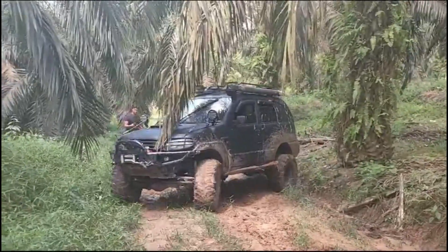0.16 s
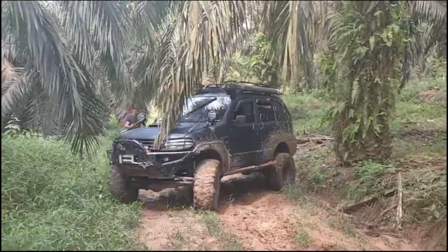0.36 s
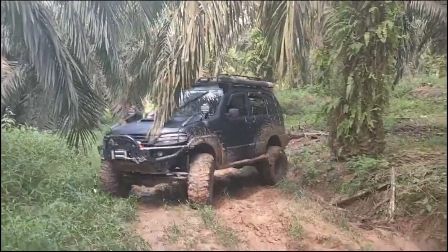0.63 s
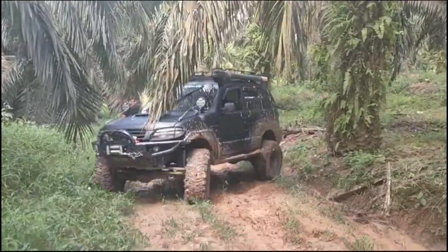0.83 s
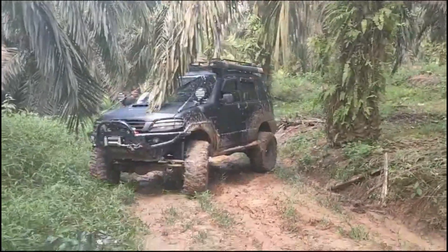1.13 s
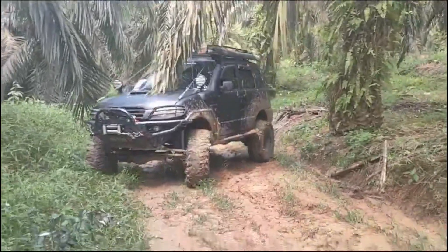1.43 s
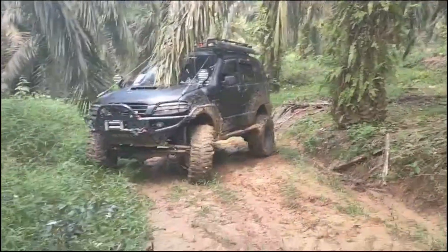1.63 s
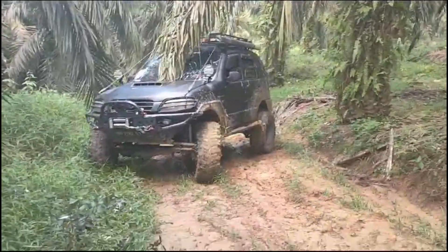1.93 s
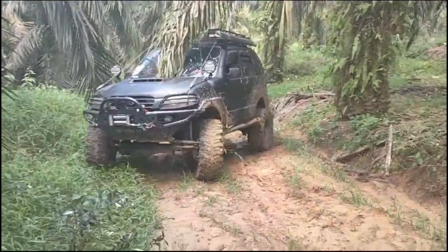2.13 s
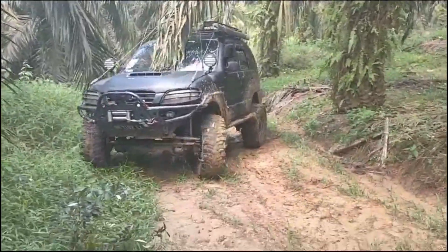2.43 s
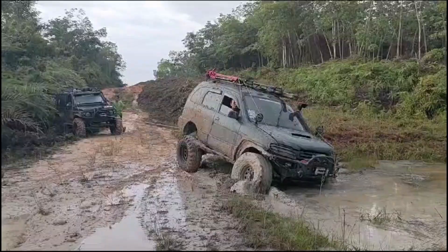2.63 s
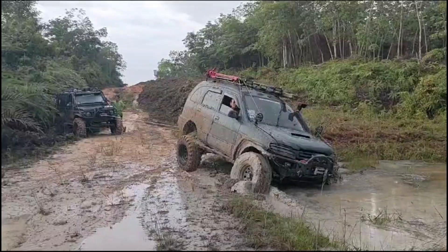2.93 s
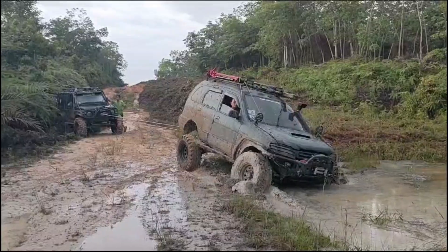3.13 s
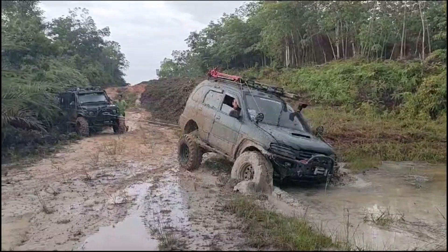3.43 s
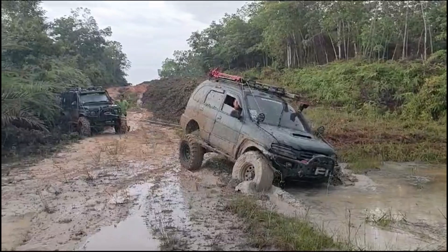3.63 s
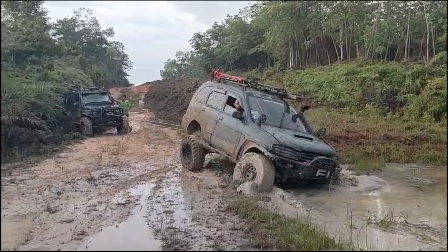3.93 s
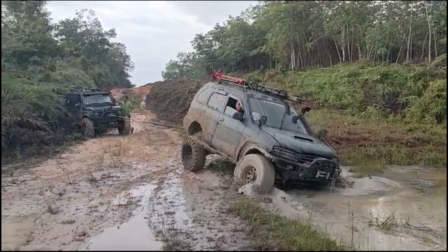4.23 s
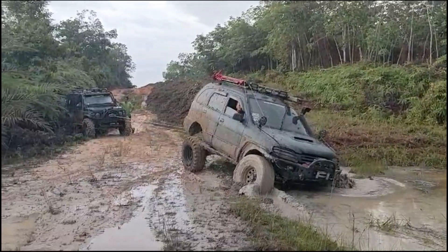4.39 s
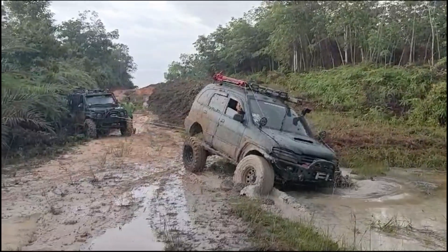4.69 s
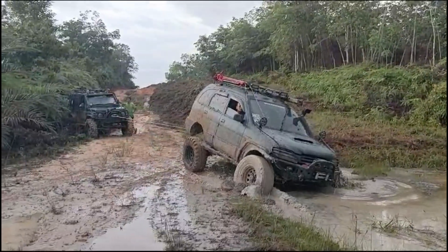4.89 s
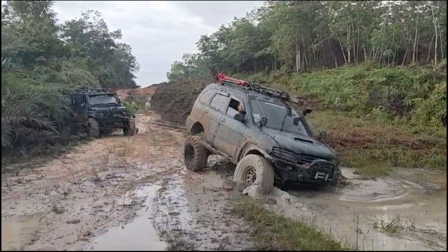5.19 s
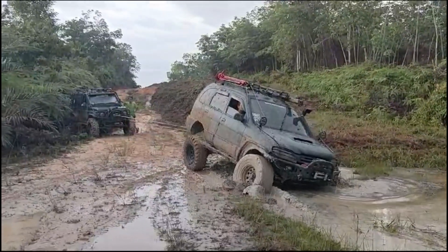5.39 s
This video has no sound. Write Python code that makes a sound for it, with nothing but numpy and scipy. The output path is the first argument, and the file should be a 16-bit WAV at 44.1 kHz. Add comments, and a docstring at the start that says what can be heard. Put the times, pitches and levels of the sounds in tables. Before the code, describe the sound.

A four-cylinder diesel throbs deeply on a dirt track, surging, sagging to a slow lug with loose metal rattling, then climbing to a loping roar. It cuts hard; after a tiny gap a faster, closer truck fades in, dips and revs again under a whining fan, with a soft bump, fine water spray and faint cicadas. Outdoor stereo, small handheld microphone with low wind rumble.

```python
"""First a deep diesel beat: a four-cylinder truck lugs off road through a palm grove. It rattles at its lowest revs.
After a hard cut and a short gap, a second such truck fades in, churning in a mud pool under a fan's whine.
Each exhaust is a stack of tones locked to the firings; growl, clatter, wind, spray and rattles are shaped noise.
The fan, a hum and a whistle are wavering tones; a damped bump is the chassis landing.
Cicadas in the trees behind are narrow bands of pulsing noise."""
import sys
import numpy as np
from scipy import signal
from scipy.fft import rfft, irfft, next_fast_len
from scipy.io import wavfile
from scipy.ndimage import uniform_filter1d, map_coordinates

SR = 44100
rng = np.random.default_rng(int(sys.argv[2]) if len(sys.argv) > 2 else 0)


def unload_wav(signal):
    """Save mono or channel-first audio to the path in sys.argv[1] as 16-bit WAV at rate SR, clipped to [-1, 1]."""
    wavfile.write(
        sys.argv[1],
        SR,
        np.round(np.clip(np.atleast_2d(signal).T, -1, 1) * 32767).astype(np.int16),
    )


N = 244781
TIME = np.arange(N) / SR  # s
SIZE = next_fast_len(N + SR // 2)
HZ = np.fft.rfftfreq(SIZE, 1 / SR)

# How the first engine runs and pulls: start_s, firings_hz, load_db, boom_db (low exhaust over the rest)
GROVE_ENGINE = [(0, 33.15, -56.5, 6), (.07, 32.7, -42.5, -8), (.15, 30.9, -45.5, 6.5),
                (.25, 34.57, -45, 11), (.32, 34.92, -42, 9), (.55, 42.72, -34, -0.5),
                (.62, 44.37, -40, 9.5), (.7, 45.26, -39, 7.5), (.87, 39.74, -36.5, -2),
                (1.09, 32.18, -54.5, 20), (1.31, 29.24, -45.5, 3), (1.4, 28.6, -43, -2),
                (1.5, 34.1, -42, 4.5), (1.57, 39.26, -36.5, 6), (1.68, 44.8, -36.5, -6),
                (1.75, 47.13, -46.5, 9.5), (1.9, 50.2, -35.5, -3.5), (2.09, 56.8, -14.5, -33.5),
                (2.18, 55.04, -20.5, -26), (2.35, 50.5, -34.5, -10), (2.47, 51.65, -35.5, -0.5),
                (2.55, 53, -33.5, -2)]
# How its exhaust pipe colours a tone: pitch_hz, gain_db
GROVE_PIPE_COLOUR = [(30, -42), (55, 11), (75, 16), (95, 4.5), (120, 7), (175, 11.5), (198, 18),
                     (212, 11.5), (225, 3), (245, 1), (290, 0.5), (335, -5.5), (365, -13), (410, -15.5),
                     (450, -22), (520, -43)]
# Extra level of its upper exhaust tones: start_s, gain_db
GROVE_UPPER_TONES = [(0, 5), (.25, -12.5), (.55, -4), (.85, -3), (1.0, 1), (1.2, 1), (1.45, -0.5),
                     (1.6, -5), (1.75, 2), (1.9, 6.5), (2.1, -11), (2.25, -0.5), (2.38, 7.5), (2.55, 10)]
# Relative strength of its four cylinders: gain_db, before the lope scales it
GROVE_CYLINDER_STRENGTH = [-2, -8, 1.5, 3]
# How unevenly the cylinders fire: start_s, amount (0 to 1)
GROVE_LOPE = [(0, .1), (1.93, .08), (2.05, 1), (2.25, 1), (2.38, .12)]
# Colour of its low exhaust noise: pitch_hz, relative level_db
GROVE_RUMBLE_COLOUR = [(18, -60), (30, -18), (108, -6.5), (189, -4.5), (217, 4.5), (467, -22), (600, -48),
                       (780, -76), (1320, -120)]
# Colour of its growl and clatter: pitch_hz, relative level_db (per Hz)
GROVE_NOISE_COLOUR = [(290, -39), (500, -6), (648, 2.5), (706, 2), (876, -0.5), (1350, -1.5), (1750, -10.5),
                      (1880, -4), (3480, -15), (4070, -12.5), (7030, -22.5), (8120, -36), (11100, -36),
                      (15500, -47.5)]
# Which side its noise leans to: pitch_hz, left_minus_right_db
GROVE_LEAN = [(60, -1.5), (1290, 0.5), (2250, 3.5), (4100, -12.5), (5700, 6), (6800, -5.5), (7400, -6),
              (8120, 3), (15000, -1.5)]
# Wind on the ports that pick up the sound: start_s, level_db
WIND_LEVEL = [(0.0, -67), (0.29, -37), (0.82, -54), (1.01, -35), (1.6, -36), (1.82, -55.5), (2.55, -61)]


def grove_truck(ports):
    """Deep exhaust beat that lopes at high revs, with engine noise that grows with the revs and wind on the ports."""
    hz, load_db, boom_db = curves(GROVE_ENGINE)
    orders_db = orders(hz, load_db, boom_db, GROVE_PIPE_COLOUR, odd=(51.4, -2),
                       upper=(GROVE_UPPER_TONES, 232), count=11, waver_db=.2)
    octaves = np.log2(hz / 40)  # revs above 40 firings a second
    growl_db = -44.5 + 9 * octaves
    clatter_db = -39 + 2.5 * octaves

    turns = firings(hz, jitter=0.012)
    lope, = curves(GROVE_LOPE)
    beat = strength(turns, GROVE_CYLINDER_STRENGTH, lope, scatter_db=1.0)
    # at high revs the tones fall out of step: 0.05 radians per firing Hz above 46
    spread = .05 * np.clip(hz - 46, 0, None)
    boom = -beat * exhaust(turns, orders_db, lag=.035, drift=.22, spread=spread)

    load = total(orders_db)
    rumble = amp(-14.5) * load * rush(coloured(GROVE_RUMBLE_COLOUR), ports, GROVE_LEAN,
                                      puffs(turns, 0.073, 0.76), patchy_db=.5)
    noise = engine_noise(GROVE_NOISE_COLOUR, ports, GROVE_LEAN,
                         puffs(turns, 0.13, 2.6, scatter_db=3), growl_db, clatter_db)
    wind_band = lambda f: 1 / (1 + (f / 32) ** 4) / (1 + (14 / (f + 1)) ** 4)
    wind = amp(curves(WIND_LEVEL)[0]) * rush(wind_band, ports, GROVE_LEAN)
    return both(boom, late_s=.000045) + rumble + noise + wind


# How the second engine runs and pulls: start_s, firings_hz, load_db, boom_db (low exhaust over the rest)
POOL_ENGINE = [(2.62, 85.5, -23.5, -13.5), (2.9, 82.14, -24, -9.5), (2.99, 80.4, -29, -1),
               (3.03, 83.2, -21.5, -9.5), (3.12, 85.9, -30, 4), (3.37, 89.94, -37.5, 8.5),
               (3.44, 84.6, -41, 8), (3.52, 81.5, -43, 3), (3.6, 75.13, -51, 17), (3.72, 65.35, -33, -10),
               (3.8, 62.94, -34.5, -8), (3.95, 66.46, -22.5, -9.5), (4.04, 71.15, -24, -9.5),
               (4.1, 75.6, -30, 11.5), (4.17, 81.55, -22.5, -6), (4.24, 84.74, -31.5, 9),
               (4.37, 80.86, -33.5, 2.5), (4.51, 81.06, -33, 3), (4.59, 78.35, -29, 4.5),
               (4.75, 81.37, -29.5, 3), (4.98, 80.7, -34.5, 4), (5.05, 78.64, -34.5, 0.5),
               (5.14, 73.2, -36, 9), (5.24, 71.43, -34, 1), (5.33, 66.62, -37, 1),
               (5.45, 59.03, -38.5, -19), (5.55, 56.86, -31, -7)]
# How its exhaust pipe colours a tone: pitch_hz, gain_db
POOL_PIPE_COLOUR = [(55, 7), (80, 5.5), (125, -3), (145, 6), (170, 8), (190, 13), (215, -2), (250, 4),
                    (290, -5), (330, -7.5), (450, -9.5)]
# Extra level of its upper exhaust tones: start_s, gain_db
POOL_UPPER_TONES = [(2.62, -7), (2.8, -0.5), (2.95, -2), (3.2, 6.5), (3.4, 16.5), (3.6, 19), (3.85, -19),
                    (4.0, -3.5), (4.15, 2), (4.3, 7.5), (4.6, -1.5), (4.9, 7), (5.2, 6.5), (5.55, 4)]
# Relative strength of its four cylinders: gain_db, before a fixed scaling
POOL_CYLINDER_STRENGTH = [0.1, 0.53, -0.78, -0.11]
# Level of its intake growl: start_s, level_db
POOL_GROWL_LEVEL = [(2.75, -30), (2.85, -28.5), (3.8, -34), (4.07, -28.5), (4.3, -34), (5.15, -33),
                    (5.22, -33), (5.5, -32)]
# Colour of its low exhaust noise: pitch_hz, relative level_db
POOL_RUMBLE_COLOUR = [(15, -42), (25, -24), (108, -10), (174, 4), (325, 1.5), (560, -21), (700, -12.5),
                      (910, -8), (1540, -120)]
# Colour of its growl and clatter: pitch_hz, relative level_db (per Hz)
POOL_NOISE_COLOUR = [(260, -24.5), (450, -12), (596, -17.5), (1060, -8.5), (1310, -14), (1680, -6.5),
                     (3320, -13.5), (3740, -11.5), (4150, -18), (5000, -16.5), (5330, -27.5), (5640, -14.5),
                     (6120, -35.5), (6270, -24), (6450, -33), (6800, -29.5), (9650, -44), (10700, -36),
                     (11200, -43), (14400, -43.5), (15500, -45)]
# Which side the noise at the pool leans to: pitch_hz, left_minus_right_db
POOL_LEAN = [(60, 0.5), (500, 0), (700, 4.5), (1000, -3.5), (1220, -9), (1500, 7.5), (2000, -12),
             (2400, 4.5), (2850, -16), (3300, 12), (3700, -12.5), (4300, 7), (5000, -6), (5600, -.5),
             (7200, -2), (8500, 0.5), (15000, -3.5)]


def pool_truck(ports):
    """Faster exhaust and close engine noise, both pulsing with the firings, plus fan, whistle and hum."""
    hz, load_db, boom_db = curves(POOL_ENGINE)
    orders_db = orders(hz, load_db, boom_db, POOL_PIPE_COLOUR, odd=(46.6, -0.15),
                       upper=(POOL_UPPER_TONES, 260), count=5, waver_db=.3)
    growl_db, = curves(POOL_GROWL_LEVEL)
    # the clatter follows a share of the growl's swings
    clatter_db = -29.5 + .24 * (growl_db - growl_db[TIME > START_S].mean())

    turns = firings(hz, jitter=0.004)
    beat = strength(turns, POOL_CYLINDER_STRENGTH, .9, scatter_db=.6)
    boom = beat * exhaust(turns, orders_db, lag=.1, drift=.25)

    # the sharp edge of each firing carries faint high orders through the intake
    edge = np.zeros(N)
    for k in range(9, 15):
        edge_db = growl_db - 1 + along(POOL_NOISE_COLOUR, k * hz) + 3.5 * wobble(14)
        edge += amp(edge_db) * np.cos(2 * np.pi * k * turns + 1.27 * wobble(30))

    load = total(orders_db)
    rumble = amp(-20.5) * load ** 0.33 * rush(coloured(POOL_RUMBLE_COLOUR), ports, POOL_LEAN,
                                              puffs(turns, 0.06, 0.5))
    noise = engine_noise(POOL_NOISE_COLOUR, ports, POOL_LEAN,
                         beat * puffs(turns, .24, 4, scatter_db=2.5), growl_db, clatter_db)
    return both(boom, late_s=.00007) + edge + rumble + noise + cooling_fan(hz) + whistle(hz) + hum()


def exhaust(turns, orders_db, lag, drift, spread=0):
    """Firing orders, nearly in step so that each firing is a pulse; the pipe delays the higher ones."""
    out = 0
    for k, db in enumerate(orders_db, 1):
        phase = 2 * np.pi * k * turns - lag * k * k - spread * (k - 4) ** 2 + drift * wobble(6)
        out = out + amp(db) * np.sqrt(2) * np.cos(phase)
    return out


def orders(hz, load_db, boom_db, pipe, odd, upper, count, waver_db):
    """Level of each firing order: load, pipe colour, boom on the low ones, extra on the upper; high ones waver more."""
    odd_from_hz, odd_db_per_hz = odd  # odd orders fade at high revs
    upper_rows, upper_from_hz = upper
    odd_db = odd_db_per_hz * np.clip(hz - odd_from_hz, 0, None)
    upper_db, = curves(upper_rows)
    levels = []
    for k in range(1, count + 1):
        pitch = k * hz
        db = load_db + along(pipe, pitch)
        db = db + boom_db / (1 + (pitch / 161.3) ** 6)  # low boom, below 161.3 Hz
        db = db + upper_db / (1 + (upper_from_hz / pitch) ** 12)
        db = db + k % 2 * odd_db + k * waver_db * wobble(13)
        if k == 1:
            db = db - 3.5  # the pipes pass the firing rate itself poorly
        levels.append(db)
    return levels


def total(levels_db):
    """Combined strength of several tones, adding their powers."""
    return np.sqrt(sum(amp(db) ** 2 for db in levels_db))


def firings(hz, jitter):
    """Running count of firings, the shaft running a little unevenly."""
    return np.cumsum(hz) / SR + jitter * wobble(30)


def strength(turns, cylinders_db, uneven, scatter_db):
    """Gain of the current firing: its cylinder's own strength plus chance, the average kept level."""
    count = int(turns.max()) + 4
    own, chance = np.resize(cylinders_db, count), rng.standard_normal(count)
    at = lambda values: map_coordinates(values, [np.abs(turns)], order=1)
    gain = amp(uneven * at(own) + scatter_db * at(chance))
    return gain / np.sqrt(np.abs(uniform_filter1d(gain ** 2, size=SR // 6)))


def puffs(turns, depth, sharp, scatter_db=0):
    """An envelope that jumps at each firing, by a chance amount, and fades before the next."""
    depth = np.clip(depth, 0, 1)
    chance = rng.standard_normal(int(turns.max()) + 2)[np.abs(turns).astype(int)]
    bursts = amp(scatter_db * chance) * np.exp(-sharp * (turns % 1))
    return 1 - depth + depth * unit(bursts)


def engine_noise(spectrum, ports, side, envelope, growl_db, clatter_db):
    """Intake growl below 1290 Hz and block clatter above, each on its own level."""
    low = lambda f: 1 / (1 + (f / 1290) ** 12)
    colour = coloured(spectrum)
    growl = rush(lambda f: colour(f) * np.sqrt(low(f)), ports, side, envelope, patchy_db=1.3)
    clatter = rush(lambda f: colour(f) * np.sqrt(1 - low(f)), ports, side, envelope, patchy_db=1.2)
    return amp(growl_db) * growl + amp(clatter_db) * clatter


# Loose panels struck: start_s, level_db (nominal, lowered for ring and crack), crack_db (crack against ring)
PANEL_STROKES = [(1.135, -32, -8), (1.169, -31, -2), (1.199, -27, 2), (1.232, -27.5, -3),
                 (1.265, -28.5, -1), (1.299, -30, -2), (1.332, -25, -2), (1.366, -28, -6),
                 (1.401, -24.5, 0), (1.434, -27.5, -4), (1.466, -25, 0), (1.496, -30, -5), (1.53, -34, -6)]
# Tinny buzz: start_s, level_db (at a stroke, before chance and fading)
TIN_BUZZ = [(1.0, -60), (1.042, -52), (1.14, -44.5), (1.2, -47.5), (1.37, -45.5), (1.4, -38.5),
            (1.47, -38.5), (1.53, -44.5), (1.6, -69.5)]
# What rings in the panels: pitch_hz, width_hz, relative level_db
PANEL_RINGS = [(853, 360, -1), (1365, 280, -1), (1883, 360, -2), (2550, 380, -7), (3820, 580, -12)]
# What sounds in the crack of a stroke: pitch_hz, width_hz, relative level_db
CRACK_RINGS = [(1900, 1300, 0)]
# What rings in the thin tin: pitch_hz, width_hz, relative level_db
TIN_RINGS = [(6980, 540, 0)]


def rattle(ports):
    """Knocked panels ring and crack at listed moments; thin tin, shaken once a firing, buzzes longer."""
    hz = curves(GROVE_ENGINE)[0]
    turns = np.cumsum(hz) / SR
    turns = turns - np.interp(1.8, TIME, turns)  # one tin stroke falls at 1.8 s, the others a firing apart
    t = turns % 1 / hz  # s since the last tin stroke
    stroke = np.floor(turns - turns.min()).astype(int)
    chance = rng.standard_normal(stroke.max() + 1)[stroke]
    tin = amp(curves(TIN_BUZZ)[0] + 1.4 * chance - 60 * t / 0.43) * (1 - np.exp(-t / 0.00079))

    panels, cracks = np.zeros(N), np.zeros(N)
    for start_s, db, crack_db in PANEL_STROKES:
        after = np.clip(TIME - start_s, 0, None)
        panels += amp(db - 5 - 60 * after / .15) * (1 - np.exp(-after / .0008))
        cracks += amp(db - 9 + crack_db - 60 * after / .03) * (after > 0)

    panel_noise = rush(modes(PANEL_RINGS), ports, GROVE_LEAN, amp(2 * wobble(300)), patchy_db=2.5)
    crack_noise = rush(modes(CRACK_RINGS), ports, GROVE_LEAN)
    tin_noise = rush(modes(TIN_RINGS), ports, GROVE_LEAN, amp(2.8 * wobble(180)))
    return panels * panel_noise + cracks * crack_noise + tin * tin_noise


def modes(table):
    """Gain of a set of resonances, each a peak of its own width."""
    return lambda f: np.sqrt(sum(amp(db) ** 2 / (1 + (2 * (f - hz) / width) ** 4)
                                 for hz, width, db in table))


FAN_ORDER = 12.28  # blade passes per firing
# How loud the fan whines: start_s, whine_db, overtone_db (both before they waver)
FAN_LEVELS = [(2.62, -44, -54), (2.9, -41, -50), (3.1, -38, -50), (3.42, -37, -50), (3.55, -48, -47),
              (3.68, -46, -40), (3.87, -38, -42), (4.0, -44, -39), (4.12, -37, -48), (4.25, -44, -44),
              (4.4, -44, -49), (4.5, -42, -44), (4.57, -45, -50), (4.66, -45, -42), (4.8, -45, -46),
              (5.0, -43, -45), (5.1, -36, -43), (5.2, -43, -52), (5.3, -45, -40), (5.42, -46, -52),
              (5.55, -46, -55)]
# Which side the fan's overtone leans to: pitch_hz, left_minus_right_db
OVERTONE_LEAN = [(1550, 7), (1750, 5), (1900, -6), (2050, -7)]


def cooling_fan(hz):
    """Blades chop the air at a pitch tied to the revs, with an overtone an octave up that moves between the sides."""
    fan_db, overtone_db = curves(FAN_LEVELS)
    blades = 2 * np.pi * FAN_ORDER * np.cumsum(hz) / SR
    fan = amp(fan_db) * whine(blades, 18)
    lean_db = along(OVERTONE_LEAN, 2 * FAN_ORDER * hz) / 2 * [[1], [-1]]
    overtone = amp(overtone_db + 1.5 * wobble(11) + lean_db) * whine(2 * blades, 22)
    return fan + overtone


# Faint whistle: start_s, left_level_db (before it wavers)
WHISTLE_LEVEL = [(2.9, -65), (3.05, -44), (3.3, -44), (3.45, -60), (3.6, -90)]


def whistle(hz):
    """A faint whistle, 16.6 cycles per firing, so it follows the revs; the right side is 15 dB weaker."""
    level_db = curves(WHISTLE_LEVEL)[0] + [[0], [-15]]
    return amp(level_db) * whine(2 * np.pi * 16.6 * np.cumsum(hz) / SR, 8)


def hum():
    """A wavering hum around a fixed 1650 Hz, stronger on the left, that swells briefly around 4.83 s."""
    level_db = -52 + 13 * np.exp(-((TIME - 4.83) / .11) ** 2)
    return amp(level_db + [[3], [-4]]) * whine(2 * np.pi * 1650 * TIME, 10)


def whine(phase, rate):
    """A tone whose size and phase wander, as in turbulent air, at the given rate (knots a second)."""
    steady = 1.1 * np.cos(phase)
    stirred = wobble(rate) * np.cos(phase) + wobble(rate) * np.sin(phase)
    return steady + .6 * stirred


# Water thrown by the wheels: start_s, level_db
SPLASH_LEVEL = [(2.62, -46.5), (4.3, -47.5), (4.93, -46), (5.45, -41.5), (5.55, -38.5)]
# Colour of that water: pitch_hz, relative level_db (per Hz)
SPRAY_COLOUR = [(3000, -50), (5000, 2), (7000, -6), (9000, -19), (15500, -24)]


def spray(ports):
    """Water thrown by the wheels: bright noise that flutters at random."""
    flutter = amp(3 * wobble(60))
    return amp(curves(SPLASH_LEVEL)[0]) * rush(coloured(SPRAY_COLOUR), ports, POOL_LEAN, flutter, patchy_db=2.2)


# The chassis lands: start_s, level_db, pitch_hz, fade_s (time to fall 60 dB)
CHASSIS_THUD = [(3.018, -25, 60, 0.091)]


def thud():
    """The landing chassis gives a low bump, a sine that dies away quickly."""
    out = np.zeros(N)
    for start_s, db, hz, fade_s in CHASSIS_THUD:
        t = np.clip(TIME - start_s, 0, None)
        out += amp(db - 60 * t / fade_s) * np.sin(2 * np.pi * hz * t)
    return out


# Kinds of cicada: pitch_hz, width_hz, relative level_db, pulses_per_s (on average)
CICADA_KINDS = [(10474, 79, 0.5, 61), (9000, 88, -7, 36)]
# Swelling of the whole chorus: start_s, gain_db
CHORUS_LEVEL = [(2.62, -61), (3.7, -56), (4.1, -64.5), (4.6, -57), (5.55, -54.5)]


def cicadas(ports):
    """Narrow noise bands, pulsing fast and swelling together."""
    out = np.zeros((2, N))
    for hz, width, db, rate in CICADA_KINDS:
        pulse_hz = rate * (1 + .06 * wobble(1.5))
        pulse = 1 + .6 * np.sin(2 * np.pi * np.cumsum(pulse_hz) / SR)
        band = lambda f: np.exp(-((f - hz) / width) ** 2)
        out += amp(db + 0.76 * wobble(6.5)) * rush(band, ports, POOL_LEAN, pulse, patchy_db=.8)
    return amp(curves(CHORUS_LEVEL)[0]) * out


def rush(gain, ports, side, envelope=1, patchy_db=3.0):
    """Stereo noise of rms 1 under an envelope, in patches of random gain, then coloured."""
    share, turn = ports
    z = signal.stft(rng.standard_normal((2, N)), nperseg=512)[2]
    field = uniform_filter1d(rng.standard_normal(z.shape[1:]), size=5, axis=0)
    field = uniform_filter1d(field, size=10, axis=1)
    patchy = signal.istft(z * amp(patchy_db * unit(field)), nperseg=512)[1][:, :N]
    shared, apart = rfft(envelope * patchy, SIZE) * gain(HZ) * np.sqrt([share, 1 - share])
    lean = amp(along(side, HZ) / 2)
    left = (shared + apart) * lean
    right = (shared - apart) * turn / lean
    return unit(irfft([left, right], SIZE)[:, :N])


def ports_of(alike, paths):
    """Share of sound common to both ports and the turn of phase at the right one."""
    in_step = 1 / (1 + (HZ / 1150) ** 12)  # below 1150 Hz both ports move in step
    arrivals = sum(gain * np.exp(-2j * np.pi * HZ * delay_s) for delay_s, gain in paths)
    late = in_step + (1 - in_step) * arrivals
    return (1 + np.clip(along(alike, HZ) * np.abs(late), 0, 1)) / 2, late / np.abs(late)


def both(x, late_s):
    """One sound at both ports, the right one late."""
    return np.array([x, np.interp(TIME - late_s, TIME, x)])


def amp(db):
    """Decibels to a plain gain."""
    return 10 ** (np.asarray(db) / 20)


def unit(x):
    """Scale to an rms of 1."""
    return x / np.sqrt(np.mean(x ** 2) + 1e-20)


def along(points, hz):
    """Read (pitch_hz, value) points on a log pitch axis."""
    f, v = np.transpose(points)
    return np.interp(np.log(hz + 1), np.log(f + 1), v)


def coloured(points):
    """Gain at every pitch from (pitch_hz, level_db) points."""
    return lambda f: amp(along(points, f))


def curves(rows):
    """One value per sample for each column after the time."""
    s, *cols = np.transpose(rows)
    return [np.interp(TIME, s, c) for c in cols]


def wobble(rate):
    """A smooth random curve, rate knots a second."""
    return map_coordinates(rng.standard_normal(int(N * rate / SR) + 4), [TIME * rate])


def filtered(x, response):
    """x times a response over frequency."""
    return irfft(rfft(x, SIZE) * response(HZ), SIZE)[..., :N]


CUT_S, START_S = 2.558, 2.6095  # the first place ends, the second begins
# How alike left and right are, before the paths act: pitch_hz, likeness (0 to 1)
GROVE_LIKENESS = [(30, .998), (200, .997), (330, .99), (500, .95), (770, .95), (1030, .65), (1250, .75),
                  (1650, .35), (1900, .5), (2300, .35), (2900, .4), (4200, .15), (5400, .38), (6400, .15),
                  (15000, .2)]
POOL_LIKENESS = [(30, .998), (210, .995), (330, .985), (510, .65), (770, .96), (1030, .8), (1250, .4),
                 (15000, .4)]
# Ways of the shared sound to the right port, one of them inverted: delay_s (negative is early), gain
GROVE_ARRIVALS = [(.00036, 1), (-.0002, -.5)]
POOL_ARRIVALS = [(.000306, .75), (.001406, -.75)]


def scene():
    """The first place stops at the cut, leaving a very short faint tail; after a gap the second fades in."""
    grove = ports_of(GROVE_LIKENESS, GROVE_ARRIVALS)
    pool = ports_of(POOL_LIKENESS, POOL_ARRIVALS)
    around_cut = amp(-20.5 - 60 * np.abs(TIME - CUT_S) / 0.04)
    first = np.clip((CUT_S - TIME) / 0.0019, 0, 1) + around_cut
    since = TIME - START_S
    fade_db = -10 * np.clip(1 - since / 0.18, 0, 1)  # opens 10 dB down, rises over 0.18 s
    second = np.clip(since / 0.0098, 0, 1) * amp(fade_db)
    first_place = grove_truck(grove) + rattle(grove)
    second_place = pool_truck(pool) + spray(pool) + thud() + cicadas(pool)
    return first * first_place + second * second_place


def record(dry):
    """Keep only what lies below the band limit of 15698 Hz."""
    return filtered(dry, lambda hz: hz < 15698)


dry = scene()
out = record(dry)
unload_wav(out)
```